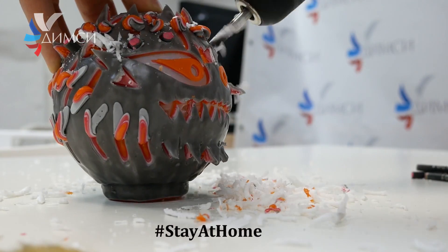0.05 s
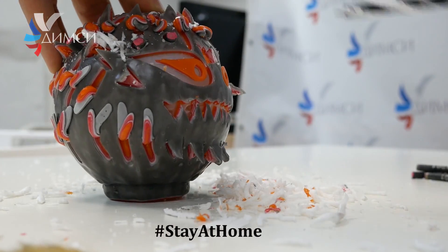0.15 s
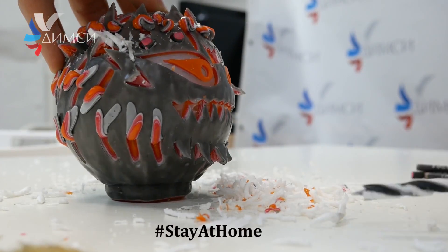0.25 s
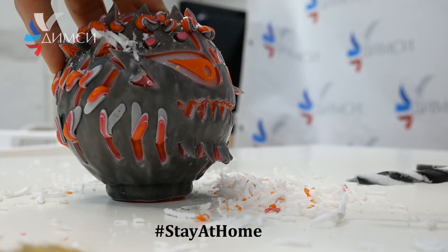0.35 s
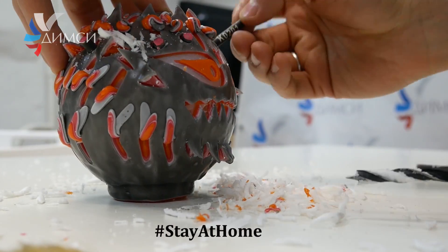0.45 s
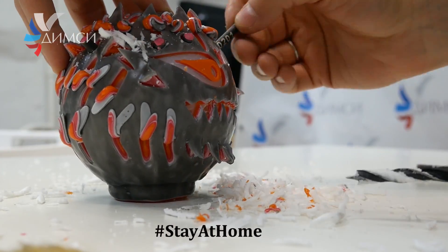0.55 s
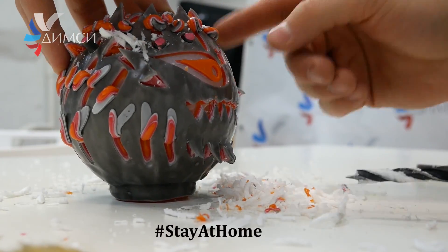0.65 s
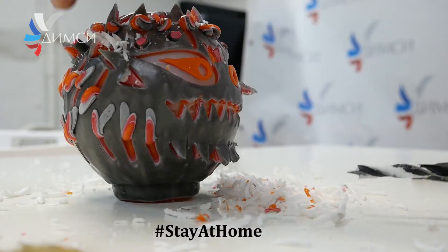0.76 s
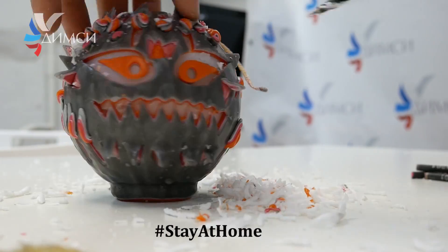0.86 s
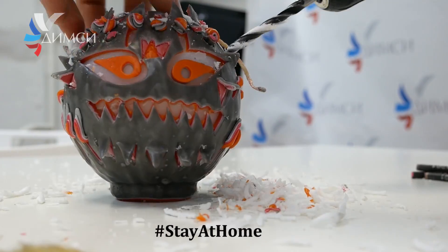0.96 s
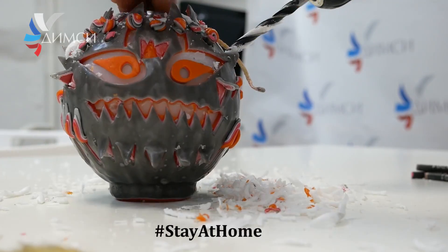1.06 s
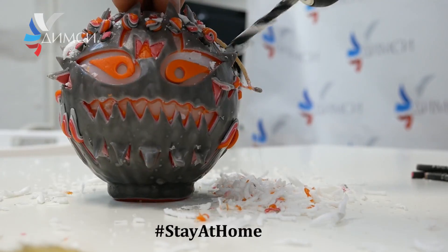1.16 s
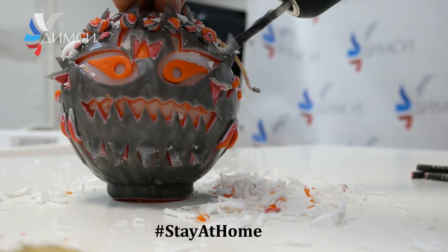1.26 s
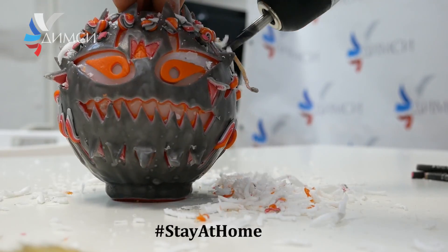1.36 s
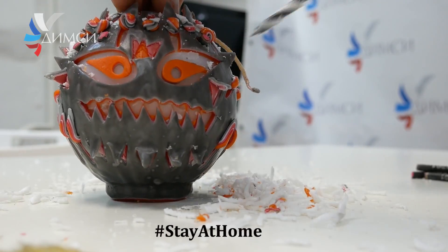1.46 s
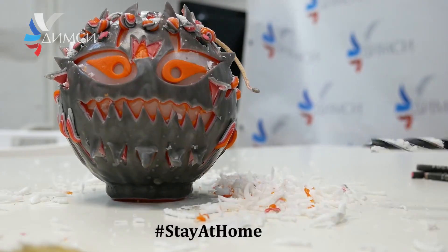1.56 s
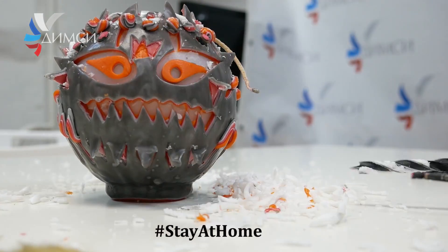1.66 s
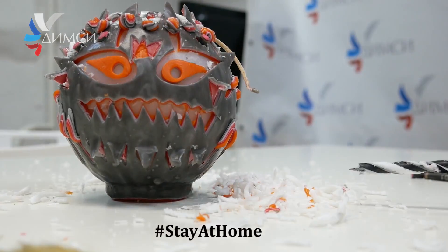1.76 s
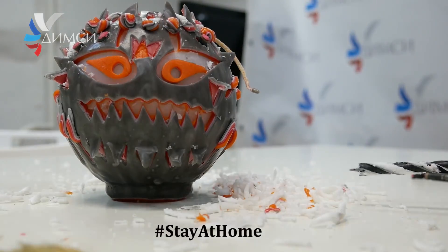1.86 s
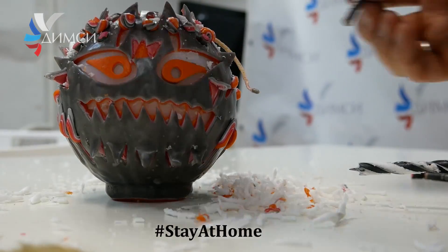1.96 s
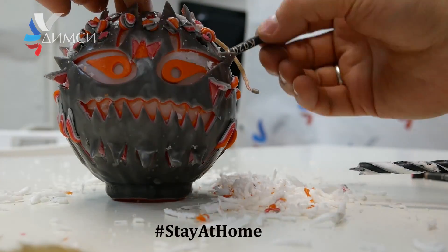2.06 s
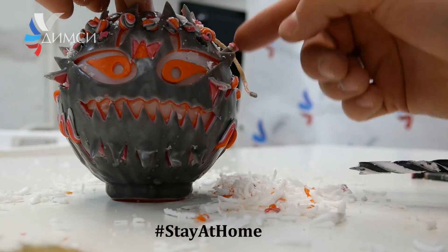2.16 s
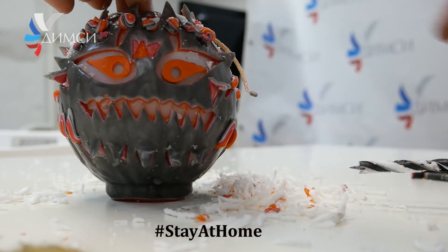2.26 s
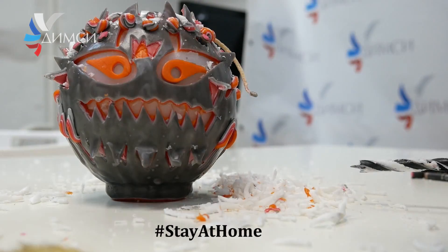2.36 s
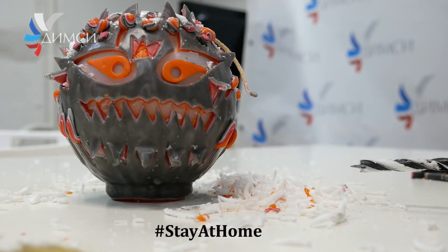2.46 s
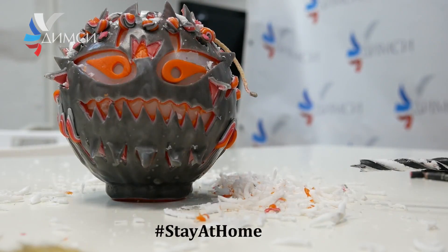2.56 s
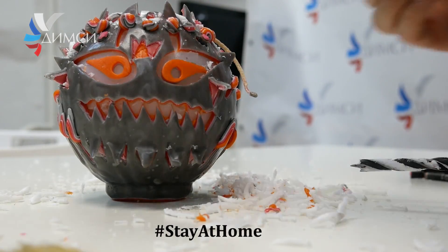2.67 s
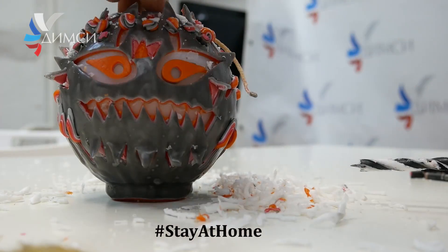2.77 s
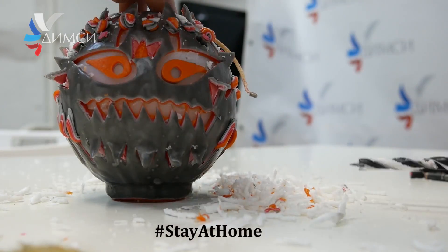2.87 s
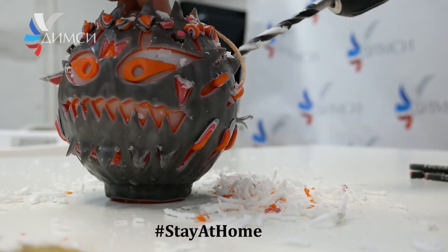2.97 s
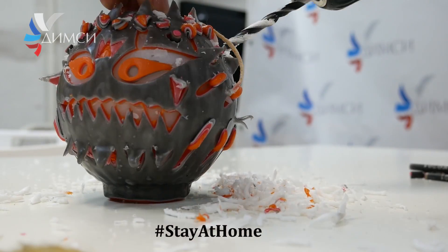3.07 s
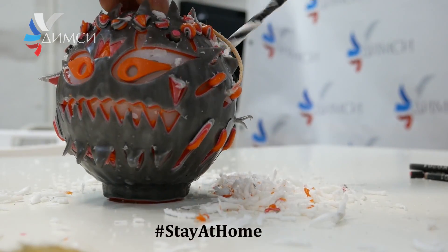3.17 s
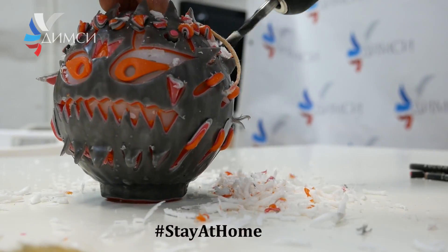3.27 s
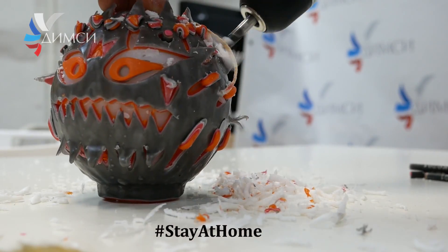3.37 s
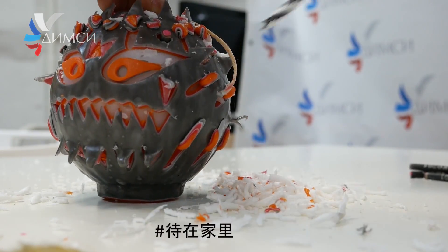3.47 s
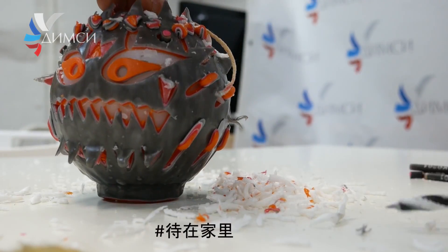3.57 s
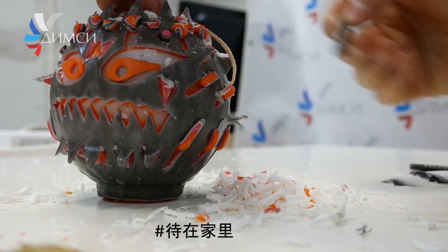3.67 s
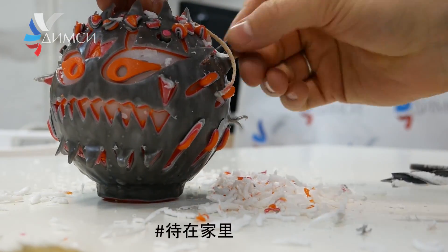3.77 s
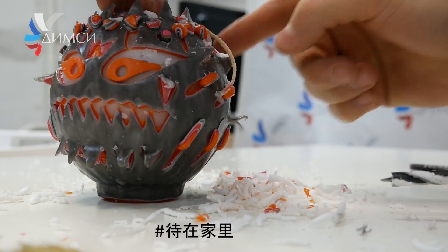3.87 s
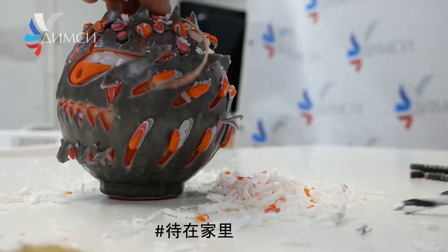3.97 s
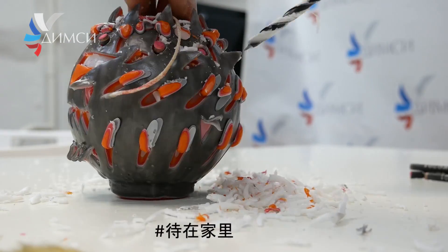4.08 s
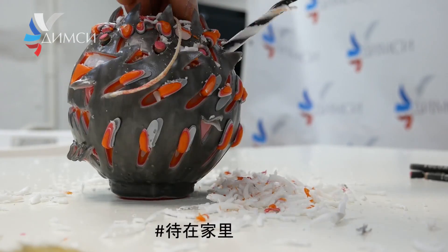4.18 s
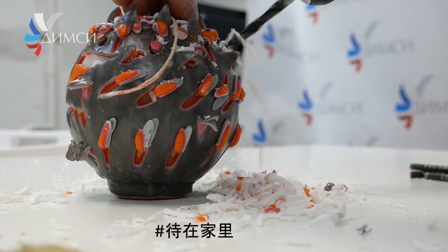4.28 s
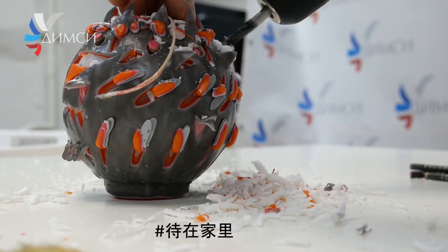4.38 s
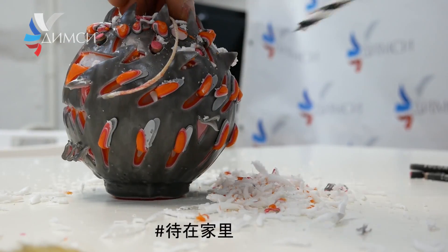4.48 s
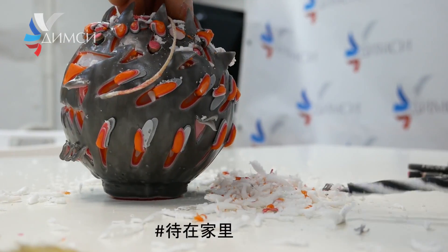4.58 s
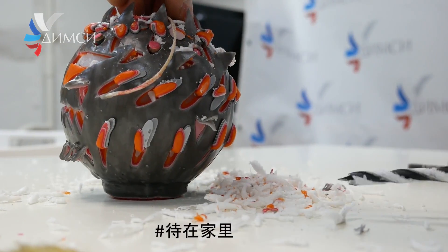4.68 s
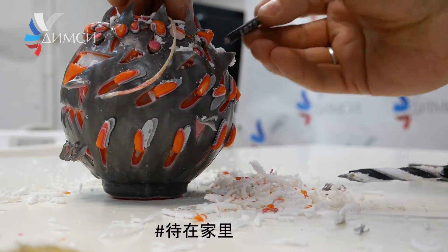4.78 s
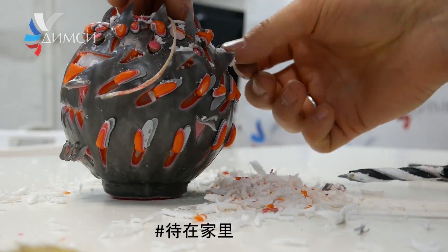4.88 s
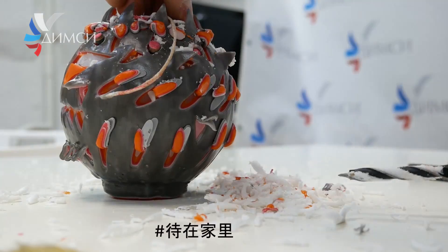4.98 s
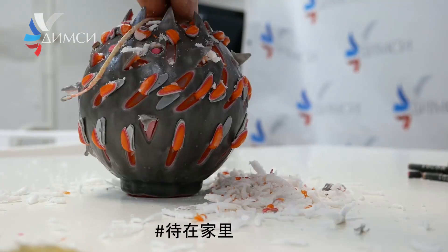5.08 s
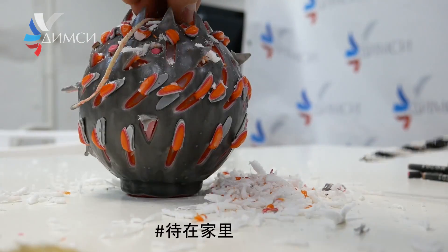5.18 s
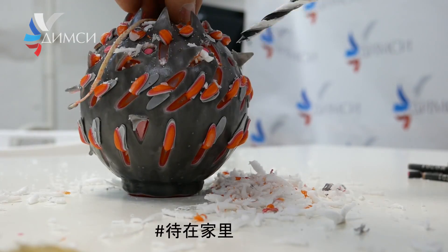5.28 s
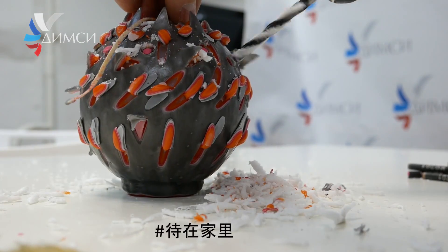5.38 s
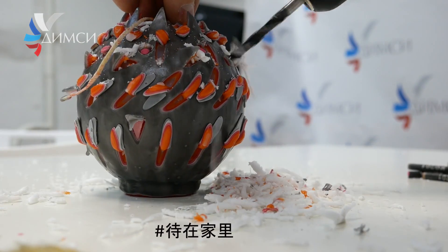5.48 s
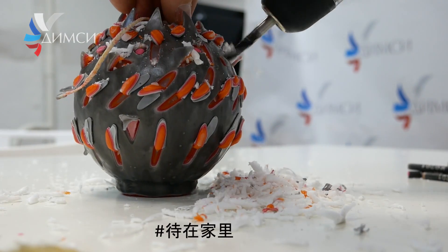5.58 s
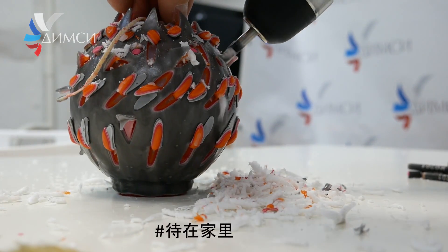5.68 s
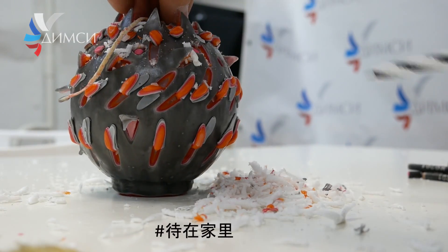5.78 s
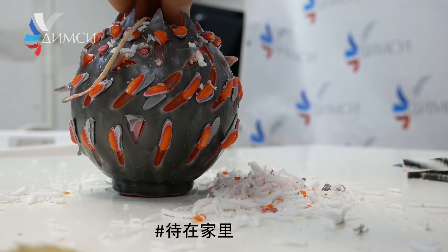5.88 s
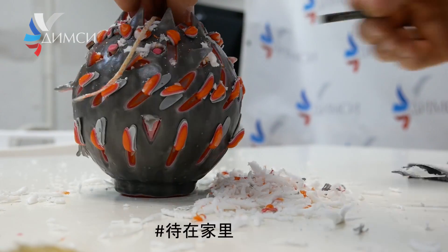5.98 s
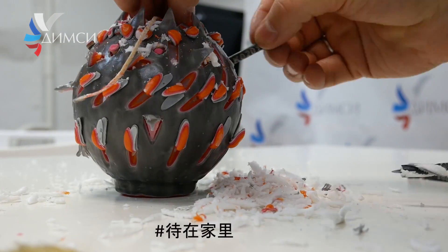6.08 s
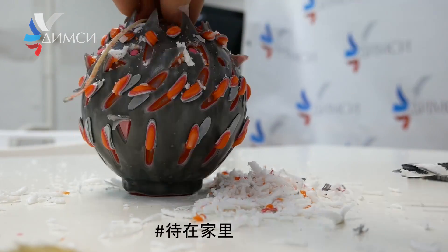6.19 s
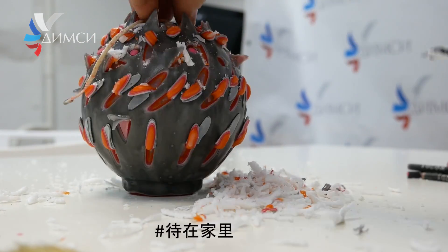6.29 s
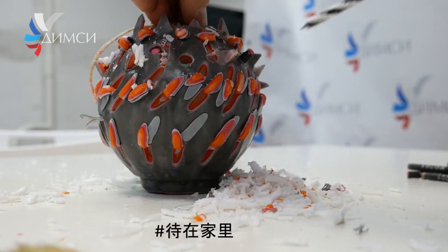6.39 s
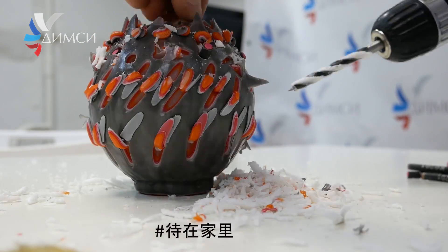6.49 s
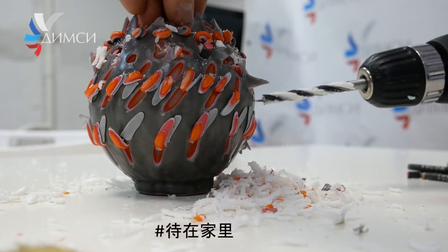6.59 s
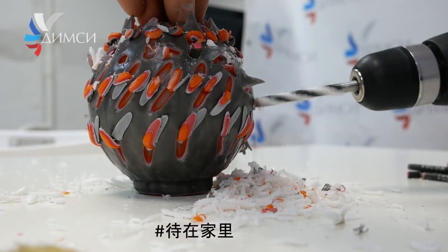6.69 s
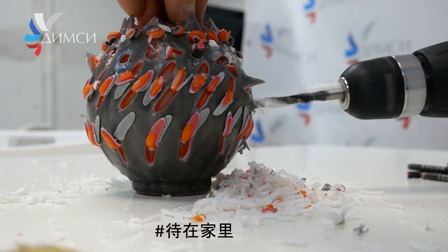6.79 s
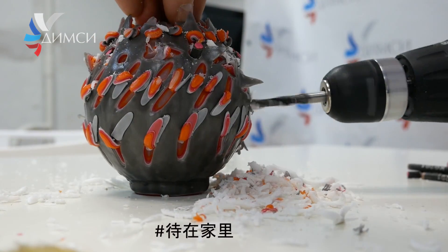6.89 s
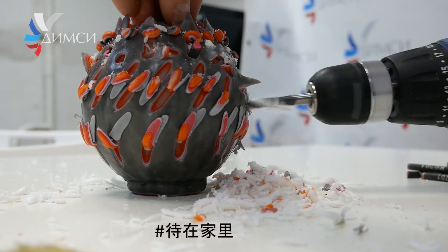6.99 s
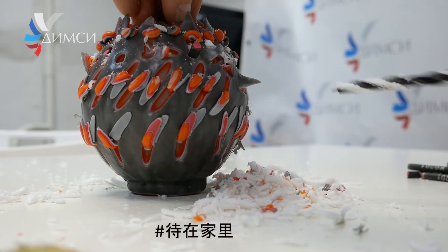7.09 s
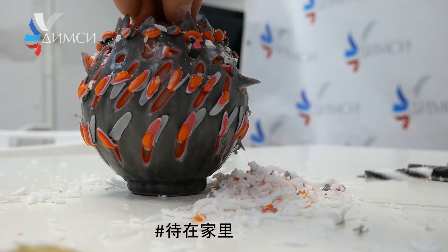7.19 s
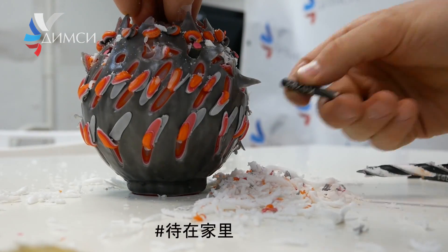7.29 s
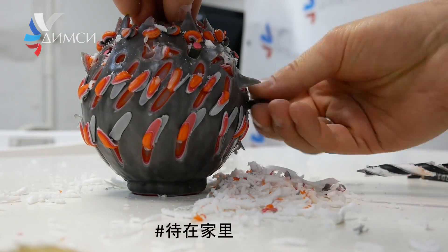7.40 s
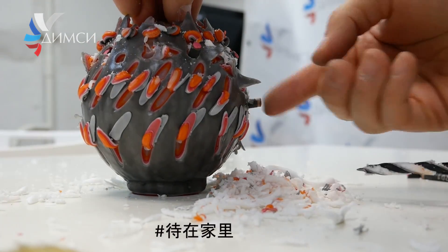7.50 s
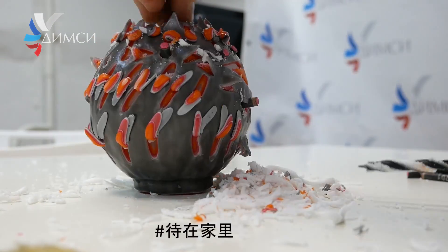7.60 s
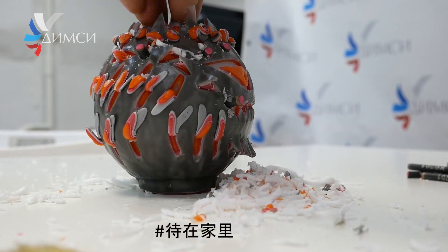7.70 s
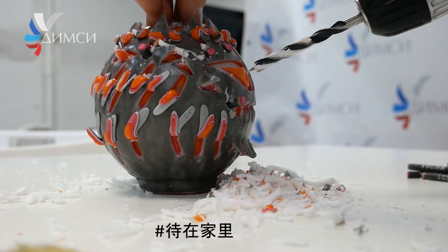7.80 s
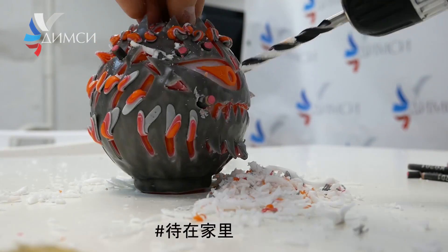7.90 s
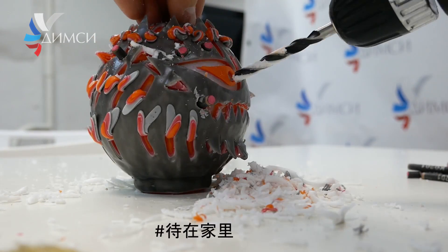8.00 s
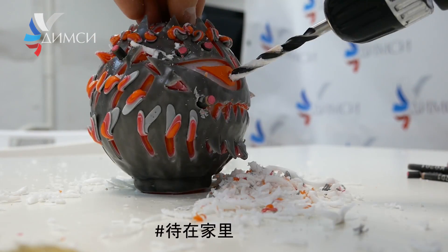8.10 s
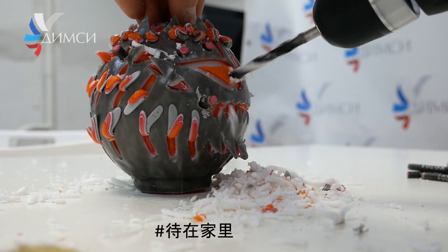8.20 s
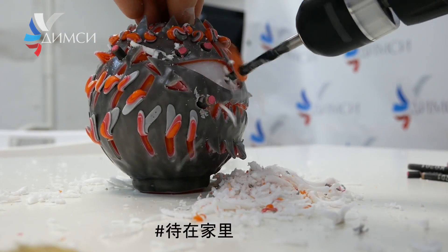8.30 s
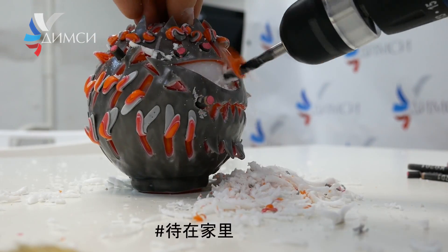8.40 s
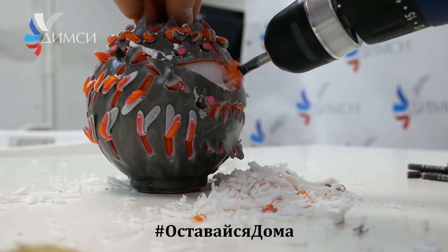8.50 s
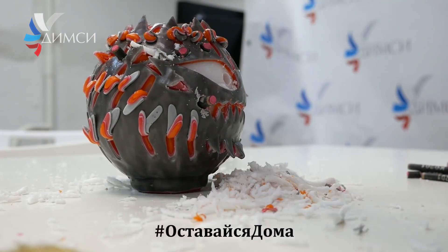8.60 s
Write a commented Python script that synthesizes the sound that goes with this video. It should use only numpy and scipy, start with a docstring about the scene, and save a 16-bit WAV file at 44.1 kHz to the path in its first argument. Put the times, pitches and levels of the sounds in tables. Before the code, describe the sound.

A cordless drill buzzes in seven short bursts boring into a wax candle, each coasting down, with clicks and table knocks between.

```python
"""Cordless drill in a wax candle

A drill bores into a candle on a table in seven short bursts, close to a wide stereo microphone.
The motor spins up, holds and coasts down: sines follow its speed, and shaped noise makes the rattle of the
gears, the grinding of the bit in the wax and the hiss of the brushes. The first burst is already running.
Hands turn the candle in between: it knocks on the table as a set of ringing modes, small parts click as
noise through resonances, and the room tone, a steady noise, comes back up after each burst."""
import sys
import numpy as np
from scipy import signal
from scipy.fft import rfft, irfft, next_fast_len
from scipy.io import wavfile

SR = 44100
rng = np.random.default_rng(int(sys.argv[2]) if len(sys.argv) > 2 else 0)


def output_pcm(signal):
    """Save a mono or channel-first signal as 16-bit PCM at the path in sys.argv[1].

    Samples are clipped to [-1, 1] before scaling.
    """
    pcm = np.clip(np.atleast_2d(signal).T, -1, 1) * 32767
    wavfile.write(sys.argv[1], SR, np.round(pcm).astype(np.int16))


N = 381465   # length in samples


def amp(db):
    """Turn a level in dB into a gain."""
    return 10 ** (np.asarray(db) / 20)


def rms_one(x):
    """Scale a signal so that its average strength (rms) is 1."""
    return x / np.sqrt(np.mean(x ** 2) + 1e-20)


def level_curve(table):
    """Join the (time, level) points of a table by straight lines, at every sample."""
    time_s, level_db = np.transpose(table)
    return np.interp(np.arange(N) / SR, time_s, level_db)


def pan(db):
    """Left and right gains for a level difference; positive is louder on the left."""
    return amp(np.multiply.outer([.5, -.5], db))


def drift(rate_hz):
    """Slow random wandering, separate in each channel: noise smoothed twice, then scaled to rms 1."""
    r = np.exp(-2 * np.pi * rate_hz / SR)
    noise = rng.standard_normal((2, N + SR))
    wander = signal.lfilter([1], [1, -2 * r, r * r], noise)
    return rms_one(wander[:, SR:])   # the first second only settles the filter


def coloured(spectrum, peaks=(), source=None, shared=0.):
    """Noise shaped by a spectrum and resonances, partly the same in both channels; rms 1."""
    size = next_fast_len(N)
    hz = np.maximum(np.arange(size // 2 + 1) * SR / size, 1)
    points = np.array(spectrum)
    db = np.interp(np.log(hz), np.log(points[:, 0]), points[:, 1], left=-90, right=-90)
    for centre_hz, width_hz, lift_db in peaks:
        db = db + lift_db / (1 + (2 * (hz - centre_hz) / width_hz) ** 2)
    if source is None:
        shared = np.clip(shared, 0, 1)
        own_noise = np.sqrt(1 - shared) * rng.standard_normal((2, N))
        source = own_noise + np.sqrt(shared) * rng.standard_normal(N)
    return rms_one(irfft(rfft(source, size) * amp(db), size)[:, :N])


# spectrum of the room tone: (pitch_hz, relative level_db)
ROOM_TONE = [(15, -60), (25, -16.5), (129, -5), (208, -1.5), (267, -2.5), (324, -3.5), (364, -2.5),
             (417, -3), (787, -7), (1050, -16), (2500, -23), (3250, -40), (5500, -120)]
# room tone before it sinks after the bursts: (time_s, level_db)
ROOM_LEVEL = [(.5, -48), (1.0, -52.5), (1.9, -52), (2.35, -56), (2.55, -52), (2.7, -59.5), (3.1, -56),
              (4.1, -52), (5.0, -54), (5.2, -48.5), (5.4, -54), (6.25, -55), (6.36, -49), (6.68, -56),
              (7.65, -50), (7.85, -54), (8.16, -57)]
# spectrum of hands rubbing on wax: (pitch_hz, relative level_db)
RUSTLE = [(590, -23), (1000, 1.5), (1060, -4), (2070, -11), (2600, -11.5), (3870, -12), (8110, -29),
          (10200, -25.5), (13000, -45)]
# how strongly the hands rub, before the same sinking: (time_s, level_db)
HANDS = [(.55, -62), (.79, -59), (1.1, -63), (1.93, -54), (2.03, -55), (2.2, -64), (2.4, -62), (2.53, -59),
         (2.68, -67), (3.12, -62), (4.0, -59), (5.0, -61), (5.22, -60), (5.4, -62), (6.3, -59), (6.5, -65),
         (6.65, -63), (7.45, -60), (7.66, -58), (7.76, -58), (7.85, -64), (7.96, -62), (8.16, -71)]
SINK_DB, CREEP_BACK_S = -10, .15   # the background sinks with each burst and creeps back


def background():
    """Room tone, and hands on wax: noise that many tiny random grains make gritty."""
    t = np.arange(N) / SR
    sunk_db = np.zeros(N)
    for row in BURSTS:
        released_s, shaft_stops_s = row[1], row[11]
        since_stop = np.clip(t - shaft_stops_s - .04, 0, None)
        sunk_db += SINK_DB * (t > released_s) * np.exp(-since_stop / CREEP_BACK_S)

    # about 150 grains a second, each dying away over some 1.5 ms
    grain_db = 5.0 * np.minimum(rng.exponential(1, N), 4)
    grains = (rng.random(N) < 150 / SR) * amp(grain_db)
    grit = 1 + 0.24 * signal.lfilter([1], [1, -.985], grains)
    gritty = rng.standard_normal((2, N)) * grit

    room = amp(level_curve(ROOM_LEVEL) + 1.5 * drift(2.7)) * coloured(ROOM_TONE)
    rustle = amp(level_curve(HANDS) + 0.5 * drift(8.7)) * coloured(RUSTLE, source=gritty)
    return amp(sunk_db) * (room + rustle)


# trigger, fingers and pegs clicking: (start_s, body peak level_db before a 1.5 dB cut, centre pitch_hz,
# treble level_db over the body, time_s for the contact to fall 60 dB, left over right level_db)
CLICKS = [(0.577, -40, 2300, -14, 0.033, -3), (0.826, -46, 2900, -25, 0.03, 0),
          (0.849, -46, 1230, -14, 0.026, -6), (0.9034, -41, 1030, -30, 0.053, -3),
          (0.9216, -31, 1030, -39, 0.029, -1), (1.175, -28, 3300, -14, 0.044, 2),
          (1.8805, -46.5, 2850, -9, 0.054, 6), (1.9624, -38, 2660, -30, 0.015, 3),
          (2.4069, -29.5, 1460, -18, 0.044, -1), (2.452, -43, 1370, -10, 0.037, -2.5),
          (2.4947, -38, 1110, -20, 0.04, -3), (2.5266, -40, 1680, -15, 0.04, -2.0),
          (2.552, -36, 1410, -34, 0.054, -3), (2.5776, -41, 1360, -33, 0.045, 10),
          (2.655, -46, 2000, -25, 0.08, 0), (2.8924, -23.5, 1120, -45, 0.029, 0),
          (2.9428, -26, 1710, -43, 0.03, -4.5), (2.9685, -37, 1700, -30, 0.03, -1),
          (3.0624, -43, 1210, -11, 0.11, 1), (3.2167, -26, 3200, -17, 0.04, 3),
          (3.9852, -38.5, 1520, -15, 0.02, -5), (4.0398, -14.5, 1190, -34, 0.037, -3),
          (4.0915, -45, 1050, -21, 0.048, -1.5), (4.243, -18.5, 3120, -7, 0.043, -9),
          (5.0735, -29, 2600, -40, 0.03, -1), (5.081, -24, 2330, -47, 0.022, -1),
          (5.1193, -24, 2700, -15, 0.019, -1.5), (5.177, -35.5, 3670, -5, 0.076, -1),
          (5.291, -22.5, 2570, -5, 0.031, -2), (5.3238, -26, 1200, -37, 0.023, -3.5),
          (5.432, -31, 900, -25, 0.04, -3), (5.446, -28, 2700, -25, 0.04, -3),
          (6.323, -38, 1500, -37, 0.03, 4), (6.3669, -37.5, 1070, -31, 0.079, 0),
          (6.4298, -43, 1020, -17, 0.037, -0.5), (6.7097, -21.5, 3050, -19, 0.029, -11),
          (7.73, -43, 2300, -30, 0.04, 0), (7.7555, -46, 1020, -22, 0.023, -2),
          (7.7762, -26, 1600, -15, 0.027, 0), (8.1823, -23.5, 3700, -16, 0.053, -8)]
# resonances of the small parts: (pitch_hz, width_hz)
CLATTER = [(650, 330), (900, 200), (1150, 200), (1420, 400), (1720, 260), (2150, 450), (2700, 330),
           (3250, 300), (3900, 400), (4600, 500)]


def clicks():
    """Short noisy contacts ring small parts near a centre pitch; the two channels share some of the noise."""
    out = np.zeros((2, N + SR))
    t = np.arange(int(.12 * SR)) / SR
    noises = rng.standard_normal((len(CLICKS), 3, len(t)))
    strengths = rng.standard_normal((len(CLICKS), len(CLATTER)))
    treble = signal.butter(2, [4000, 9000], "band", fs=SR, output="sos")
    dull = signal.butter(2, 6000, fs=SR, output="sos")
    for row, noise, strength in zip(CLICKS, noises, strengths):
        start_s, peak_db, centre_hz, treble_db, fall_s, side_db = row
        fall_s = np.clip(fall_s, .008, .3)
        envelope = (1 - np.exp(-t / (.1 * fall_s))) ** 2 * amp(-60 * t / fall_s)
        contact = (noise[:2] + noise[2] / 2) * envelope
        body = 0
        for k, (hz, width_hz) in enumerate(CLATTER):
            r = np.exp(-np.pi * width_hz / SR)
            feed = [(1 - r * r) / 2, 0, (r * r - 1) / 2]
            back = [1, -2 * r * np.cos(2 * np.pi * hz / SR), r * r]
            ring = signal.lfilter(feed, back, contact)
            # soft contacts excite high resonances least
            octaves = np.log2(hz / centre_hz)
            reach_db = -7 * abs(octaves) - 3 * octaves - 10 * np.log10(width_hz)
            body = body + (-1) ** k * amp(reach_db + 2.2 * strength[k]) * ring
        body = signal.sosfilt(dull, body)
        snap = signal.sosfilt(treble, contact)
        both = body / np.abs(body).max() + amp(treble_db) * snap / np.abs(snap).max()
        at = round(start_s * SR) - 80   # the swell begins a little early
        out[:, at:at + len(t)] += amp(peak_db - 1.5) * pan(side_db)[:, None] * both
    return out[:, :N]


# candle and drill bumping on the table: (time_s, 2 ms ahead of the blow, peak level_db before a 1 dB lift,
# best excited pitch_hz, ring length as a share, left over right level_db)
KNOCKS = [(0.272, -18.5, 227, 0.9, -1), (0.33, -30, 180, 1, 0), (0.921, -13, 260, 0.95, 4),
          (1.166, -24.5, 799, 0.55, 0), (1.638, -16.5, 520, 0.95, -3), (1.672, -27, 200, 1, 0),
          (2.94, -33.5, 393.6, 1, 3), (3.069, -26.5, 258, 0.74, -5.5), (3.613, -22, 227, 0.87, -7),
          (4.039, -7.5, 600, 0.92, 3.5), (4.609, -13, 450, 0.92, 8), (4.669, -30.5, 188, 0.93, -7),
          (5.065, -29, 278, 1, 3), (5.322, -27.5, 613, 1, 0.5), (5.433, -32.5, 207, 0.9, 11),
          (5.889, -14, 294.6, 1, 3), (6.262, -48, 161.3, 0.75, 14), (6.567, -40.5, 275.5, 0.95, 10),
          (6.709, -26, 760, 0.74, -8), (7.201, -16, 430, 1, 0), (7.235, -29, 200, 1, 0),
          (7.666, -35, 225, 0.41, -13), (8.182, -23.5, 723, 1, -1)]
# ways the table rings: (pitch_hz, level_db, time_s to fall 60 dB at ring length 1, without the hand)
TABLE = [(120, -30, 0.033), (161.3, -1.5, 0.15), (237.6, -0.5, 0.048), (291.5, 5, 0.037), (378, -1, 0.043),
         (508, 6, 0.026), (643, 0, 0.028), (738, -0.5, 0.034), (1005, 1.5, 0.023), (1560, -7, 0.042)]


def knocks():
    """Each bump rings the table's modes near its pitch; the two microphones hear each mode differently."""
    out = np.zeros((2, N + SR))
    t = np.arange(int(.15 * SR)) / SR
    hz, mode_db, fall_s = np.array(TABLE).T[:, :, None]
    no_deep_bass = signal.butter(2, 90, "high", fs=SR, output="sos")   # the table radiates none
    draws = rng.standard_normal((len(KNOCKS), 2, 2, len(TABLE), 1))
    for row, (strength, phase) in zip(KNOCKS, draws):
        time_s, peak_db, pitch_hz, length, side_db = row
        reach_db = -11 * np.abs(np.log2(hz / pitch_hz))
        decay_db = -60 * t / (fall_s * np.clip(length, .2, 3))
        gain = amp(mode_db + reach_db + 2.0 * strength + decay_db)
        rings = gain * np.sin(2 * np.pi * hz * t + 0.98 * phase)
        blow = rings.sum(axis=1) * (1 - np.exp(-t / 0.0018))   # soft contact
        blow = blow * (0.51 + np.exp(-t / 0.0091))   # the hand damps the ring after the first swing
        blow = signal.sosfilt(no_deep_bass, blow)
        at = round((time_s + 0.002) * SR)
        out[:, at:at + len(t)] += amp(peak_db + 1.0) * pan(side_db)[:, None] * blow / np.abs(blow).max()
    return out[:, :N]


# the seven bursts; the first eight columns drive the motor:
# (pulled_s, released_s, full speed_rev_per_s, spin-up time constant_s, hum level_db and commutator whine
# level_db added to their orders, pole tone level_db over the gears at 500 rev/s, whine lift_db from the
# starting current; the other thirteen shape the sound:
# sets in_s, load comes off_s, bit pulled free_s, shaft stops_s, gears level_db, level change at the start_db,
# swell time constant_s, then over the gears: bit in wax_db, its lift while dragged out_db, brush hiss_db,
# rumble_db, chuck ring_db; and left over right level_db)
BURSTS = [ (-.2, .155, 500, .04, -1, 2, -22, 0, -.2, .195, .272, .452, -29.5, -6, .15, -8, 9, -6.5, -13, -8, -1.5),
          (1.168, 1.48, 505, .045, -3, 3, -22, -9, 1.172, 1.48, 1.638, 1.775, -29.5, -4, .15, -8, 11, -6.5, -13, -8, -1.5),
          (3.21, 3.5, 510, .03, -3, 0, -22, 11, 3.214, 3.52, 3.613, 3.814, -28.5, -8, .12, -9, 9, -8, -14, -10, -1.5),
          (4.232, 4.51, 505, .033, -3, 2, -22, 5, 4.24, 4.52, 4.609, 4.798, -29.5, -2, .15, -7, 10, -5, -13, -12, -2),
          (5.432, 5.79, 497, .035, 0, -1, -22, 13, 5.437, 5.81, 5.889, 6.086, -30.5, -1, .1, -7, 10, -5.5, -12, -11, -2),
          (6.705, 7.07, 495, .045, -3, -4, -22, 6, 6.708, 7.07, 7.201, 7.34, -29.5, -4, .1, 0, -1, -7, -13, -22, -2),
          (8.195, 8.58, 495, .04, 1, 0, -11, 14, 8.184, 8.58, 8.7, 8.88, -30, -7, .13, -4, 8, -7.5, -11, -4, -1.5),
          ]
COAST_S, FRICTION_REV_S = .25, 160   # drag time constant, and braking that does not fall with speed


def motor():
    """Turns a second (exponential spin-up, then drag and friction), and the levels of the shaft's tones."""
    t = np.arange(N) / SR
    speed, tone_db = np.zeros(N), np.zeros((3, N))
    for pulled, released, full, spin_up, hum_db, whine_db, pole_db, start_db, *_ in BURSTS:
        lagging = np.exp(-np.clip(t - pulled, 0, None) / spin_up)
        drag = np.exp(-np.clip(t - released, 0, None) / COAST_S)
        falling = (full + FRICTION_REV_S) * drag - FRICTION_REV_S
        speed = np.maximum(speed, np.minimum(full * (1 - lagging), falling))
        tone_db[:, t > pulled] = np.array([[hum_db], [whine_db], [pole_db]])
        tone_db[1] += start_db * lagging * (t > pulled)   # fades as full speed is reached
    return speed, tone_db


ATTACK_DB_PER_S, STOP_DB_PER_S = 3500, 1150   # how fast the sound sets in, and dies once the shaft stops
UNLOAD_DB, UNLOAD_S, COAST_DB_PER_S = -6.5, .06, -24   # load off: a quick drop, then a steady sag
BITE_DB, BITE_S = -7, .025   # the bit joins a moment after the start; the chuck by twice the dB
FREE_DB, DRAG_FADE_S = -1, .07   # once free the bit grinds less
FREE_RUMBLE_DB, JOLT_DB, JOLT_S = 6, 12, .08   # rumble lift while coasting, and after the bit jerks free
CHUCK_FREE_DB, COAST_SIDE_DB = -10, -1   # chuck unloaded; left-right shift as the bit comes out
HISS_FADE_DB, HISS_FADE_S = -10, .035   # brushes quieten near standstill


def levels():
    """Levels in dB of gears, wax, hiss, rumble, chuck and pan: set in, swell, unload, coast, stop."""
    t, out = np.arange(N) / SR, np.zeros((6, N))
    out[0] = -120   # silent between bursts

    def fading(since, span):
        """Falls from 1 towards 0 after a moment."""
        return np.exp(-np.clip(since, 0, None) / span)

    for row in BURSTS:
        start, released, free, stop, gears_db, short_db, swell = row[8:15]
        wax_db, drag_db, hiss_db, rumble_db, chuck_db, side_db = row[15:]
        now = (t > start - .03) & (t < stop + .06)
        s = t[now]
        coasting = np.clip(s - released, 0, None)
        pulling = np.clip((s - released) / (free - released), 0, 1)   # 0 loaded, 1 pulled free

        gears = gears_db + short_db * fading(s - start, swell)
        gears = gears + UNLOAD_DB * (1 - fading(coasting, UNLOAD_S)) + COAST_DB_PER_S * coasting
        gears = gears - ATTACK_DB_PER_S * np.clip(start - s, 0, None)
        gears = gears - STOP_DB_PER_S * np.clip(s - stop, 0, None)
        bite = BITE_DB * fading(s - start, BITE_S)
        dragging = (drag_db * np.sqrt(pulling) - FREE_DB) * fading(s - free, DRAG_FADE_S)
        wax = wax_db + bite + FREE_DB + dragging
        hiss = hiss_db + HISS_FADE_DB * fading(stop - s, HISS_FADE_S)
        jolt = JOLT_DB * (s > free) * fading(s - free, JOLT_S)
        rumble = rumble_db + FREE_RUMBLE_DB * pulling + jolt
        chuck = chuck_db + 2 * bite + CHUCK_FREE_DB * pulling ** 4
        side = side_db + COAST_SIDE_DB * pulling
        out[:, now] = [gears, wax, hiss, rumble, chuck, side]
    return out


# tones of the shaft: unbalance, its double, pinion teeth, commutator bars and overtones:
# (multiple of the speed, level_db over the gears before the housing and each burst change it)
ORDER_LINES = [(1, -11), (2, -16), (9, -15), (12, -7), (24, -4), (36, -10)]


def shaft_tones(speed, turn, tone_db):
    """Sines on multiples of the speed, each with its own phase at each microphone."""
    hum_db, whine_db, pole_db = tone_db
    phases = rng.uniform(0, 2 * np.pi, (len(ORDER_LINES) + 1, 2, 1))
    # the pole tone stands out near full speed only
    tones = amp(pole_db) * (speed / 500) ** 6 * np.sin(4 * turn + phases[-1])
    for (k, db), phase in zip(ORDER_LINES, phases):
        hz = np.maximum(k * speed, 1)
        if k > 2:   # the housing passes high orders best near 3 kHz, so they stand out while gliding through
            housing_db = -16 * np.log2(hz / 3200) ** 2 + 5 / (1 + ((hz - 2800) / 250) ** 2)
            db = db + whine_db + housing_db + 3 * drift(40)
        else:   # it radiates little bass
            housing_db = -3 * np.clip(np.log2(hz / 400), None, 0) ** 2
            db = db + hum_db + housing_db + 2.5 * drift(15)
        tones = tones + amp(db) * np.sin(k * turn + phase)
    return tones


PATH_T60_S, PATH_ECHO_DB = .15, -4   # early echoes: time to fall 60 dB, level beside the direct sound
LAG_S = .001   # largest delay to a microphone


def paths(x):
    """For each burst the drill is held elsewhere: new lags and early echoes to each microphone."""
    lags = (rng.uniform(0, LAG_S, (len(BURSTS), 2)) * SR).astype(int)
    out = np.zeros((2, N))
    t = np.arange(int(.1 * SR)) / SR
    all_echoes = rng.standard_normal((len(BURSTS), 2, len(t)))
    for row, lag, echoes in zip(BURSTS, lags, all_echoes):
        echoes = echoes * amp(-60 * t / PATH_T60_S)
        path = amp(PATH_ECHO_DB) * echoes / np.linalg.norm(echoes, axis=1, keepdims=True)
        path[[0, 1], lag] += 1   # direct sound
        path = path / np.linalg.norm(path, axis=1, keepdims=True)
        first = max(round((row[0] - .15) * SR), 0)
        last = min(round((row[1] + .4) * SR), N)
        # a burst already running at the start gets a mirrored lead-in, so its echoes run too
        lead = 0 if first else len(t)
        held = np.concatenate([x[:, :lead][:, ::-1], x[:, first:last]], axis=1)
        heard = signal.fftconvolve(held, path, axes=1)
        out[:, first:last] = heard[:, lead:lead + last - first]
    return out


# spectra of the gears, bit in wax, brush hiss and rumble: (pitch_hz, relative level_db)
GEARS = [(880, -38), (1500, -3.5), (1950, -1.5), (2780, 3), (3230, 2.5), (4000, -0.5), (4570, -3.5),
         (5140, -4.5), (7000, -10), (9100, -46.5), (15400, -120)]
WAX = [(320, -44), (550, -16), (800, -8), (1180, 0), (1550, -3), (2200, -10), (2900, -34)]
HISS = [(3240, -26.5), (5500, -1), (6180, -8.5), (11600, -8), (12400, -14), (12900, -42), (13400, -42.5)]
RUMBLE = [(18, -71.5), (30, -23.5), (184, -13), (289, -6), (366, -8), (488, -8.5), (567, -10), (800, -8.5),
          (1040, -16), (1760, -120)]
# resonances of the housing and of the chuck: (pitch_hz, width_hz, lift_db)
HOUSING = [(2380, 900, -0.5), (3475, 1070, 1.5), (4170, 140, 3.5), (6140, 770, 4.5)]
CHUCK = [(4453, 860, 31.5), (4770, 250, 15.5)]
# peaks of the tooth noise at 500 rev/s, sliding with the shaft: (pitch_hz, width_hz, lift_db)
MESH = [(975, 660, 20.5), (2110, 1100, 25), (3215, 250, 17.7), (4440, 440, 26.2)]
MESH_DB = -5   # tooth noise over the gears
SHARED = .55   # share of the noise power common to both sides


def drill():
    """Seven noises, four of them beating once a turn, plus the shaft's tones."""
    gears_db, wax_db, hiss_db, rumble_db, chuck_db, side_db = levels()
    speed, tone_db = motor()
    turn = 2 * np.pi * np.cumsum(speed) / SR   # shaft angle in radians

    def beat(depth):
        """Rise and fall once a turn."""
        return 1 + depth * np.cos(turn + rng.uniform(0, 2 * np.pi))

    gears = coloured(GEARS, HOUSING, shared=SHARED) * beat(0.35) * amp(1.9 * drift(40))

    # noise read out at the shaft's pace drops in pitch as the shaft slows
    pace = np.cumsum(speed) / 500
    teeth = coloured([(500, -27.5), (6000, -43.5)], MESH, shared=SHARED)
    sliding = np.array([np.interp(pace, np.arange(N), side) for side in teeth])
    mesh = amp(MESH_DB) * sliding * np.clip(speed / 250, 0, 1)

    wax = amp(wax_db + 1.5 * drift(34)) * coloured(WAX, shared=SHARED) * beat(.3) * pan(-5.1)[:, None]
    hiss = amp(hiss_db + .8 * drift(40)) * coloured(HISS, shared=SHARED) * beat(0.22) * pan(1.3)[:, None]
    rumble = amp(rumble_db + 3.2 * drift(15)) * coloured(RUMBLE, shared=SHARED) * pan(3.9)[:, None]
    chuck = amp(chuck_db) * coloured([(3000, -25.5), (7000, -29.5)], CHUCK, shared=SHARED) * beat(0.31)

    # a narrow noise band whines while the motor turns slowly
    slow = np.clip(1 - speed / 300, 0, 1)
    whine = amp(-10) * slow * coloured([(300, -41.5), (2000, -44)], [(833, 110, 40)])

    noises = paths(gears + mesh + wax + hiss + rumble + chuck + whine)
    return pan(side_db) * amp(gears_db) * (noises + shaft_tones(speed, turn, tone_db))


def scene():
    """All sources added together at the microphones."""
    return background() + clicks() + knocks() + drill()


def record(dry):
    """The treble ends steeply: two low-pass filters, at 12.1 and 13.6 kHz."""
    soft = signal.sosfilt(signal.cheby1(8, 1, 12100, fs=SR, output="sos"), dry)
    return signal.sosfilt(signal.cheby2(12, 70, 13600, fs=SR, output="sos"), soft)


dry = scene()
out = record(dry)
output_pcm(out)
```